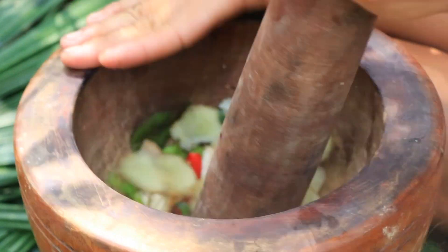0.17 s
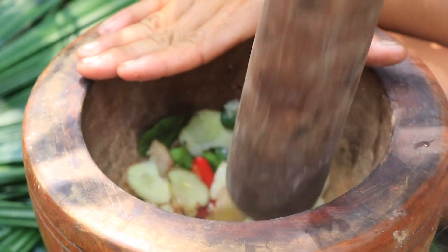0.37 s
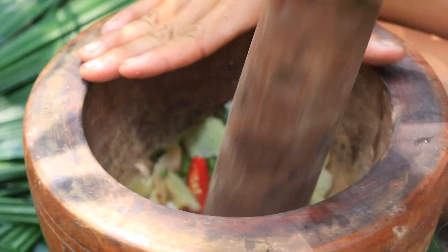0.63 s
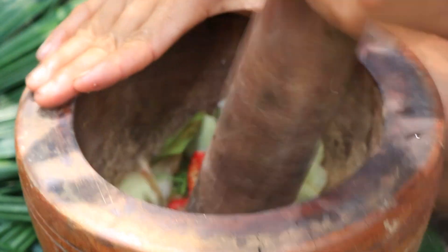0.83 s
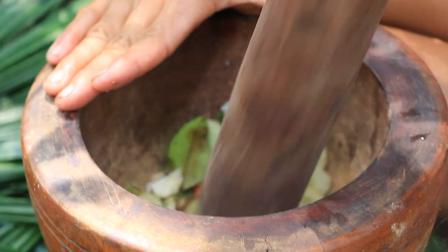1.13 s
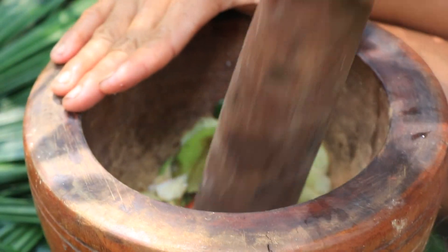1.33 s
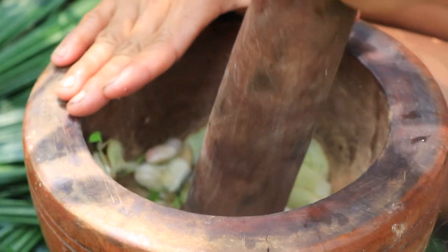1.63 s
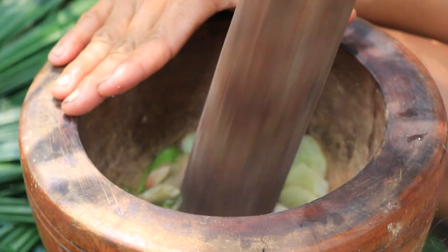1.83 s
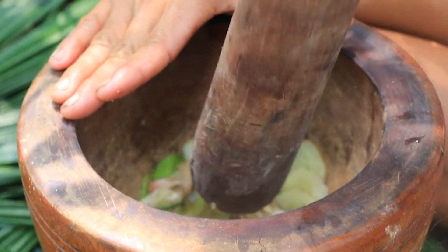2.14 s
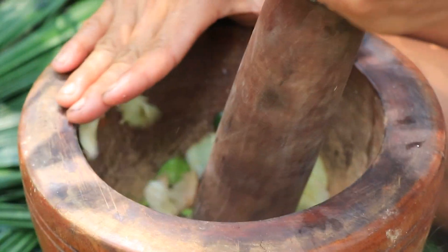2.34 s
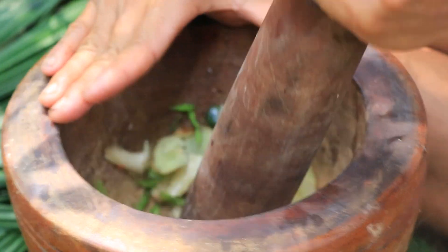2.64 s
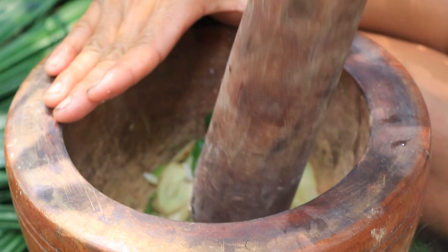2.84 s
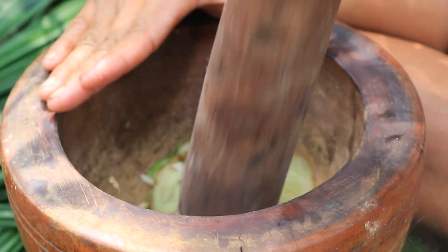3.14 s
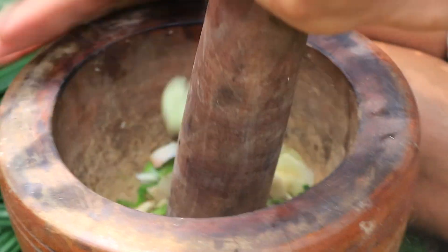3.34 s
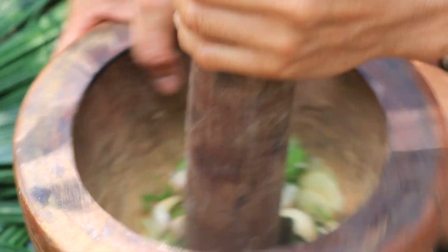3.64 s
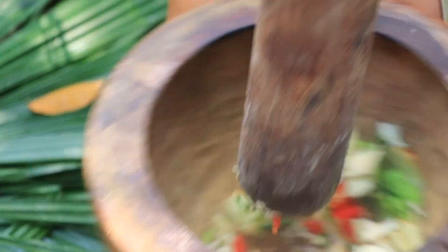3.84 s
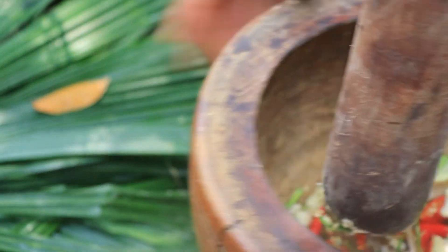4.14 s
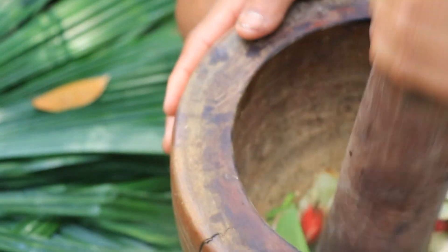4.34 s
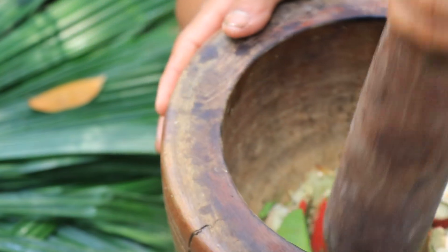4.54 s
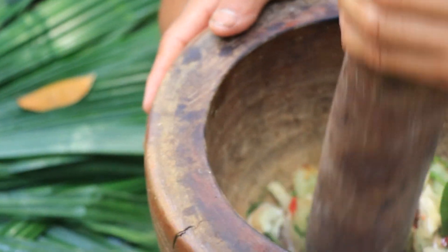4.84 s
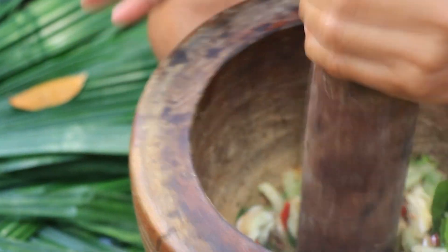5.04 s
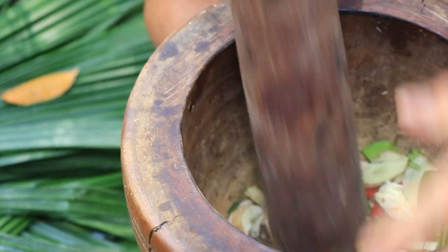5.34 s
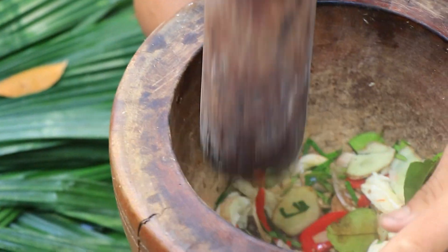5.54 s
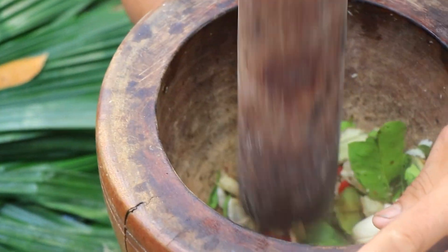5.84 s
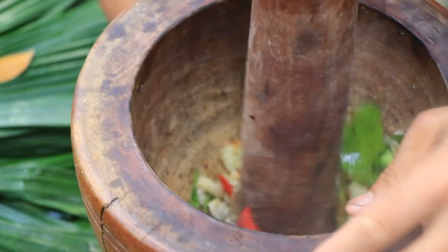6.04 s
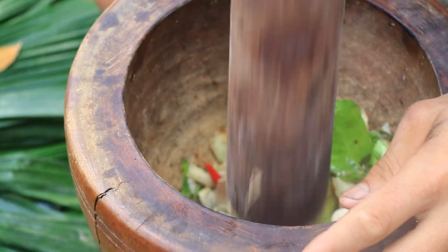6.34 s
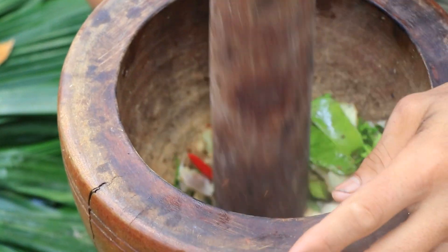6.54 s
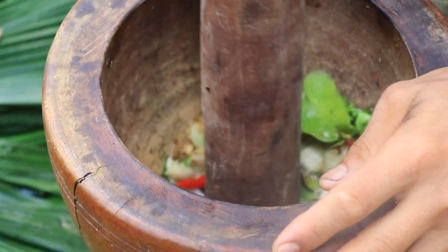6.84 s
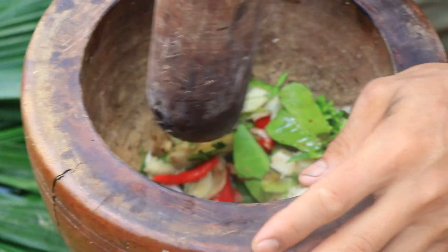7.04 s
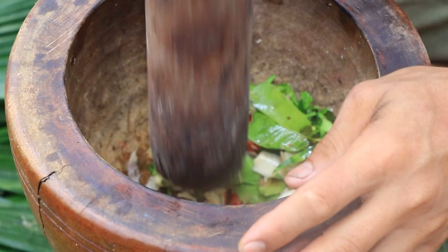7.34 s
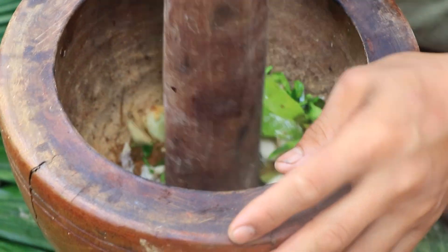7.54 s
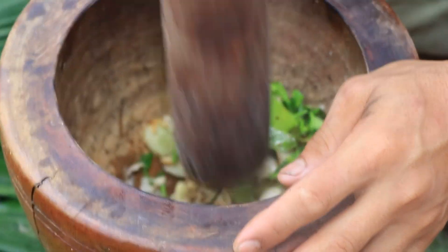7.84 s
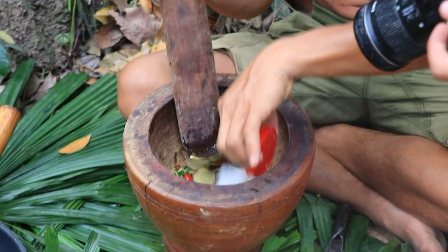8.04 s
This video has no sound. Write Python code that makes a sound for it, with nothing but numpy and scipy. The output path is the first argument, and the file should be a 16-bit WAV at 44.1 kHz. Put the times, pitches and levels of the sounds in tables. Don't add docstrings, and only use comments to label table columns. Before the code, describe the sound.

Outdoors among trees, a shrill insect chorus drones throughout, with a near cicada rasping about seven pulses a second. From 0.2 s a wooden pestle strikes herbs in a wooden mortar every 0.35 s: first crisp, wet crunches with dull thuds, and a brief leafy scrape at 0.95 s. From 1.25 s many blows reach bare wood, giving hard hollow knocks that die quickly. The cicada speeds up into a fast buzz by 3 s. After 3.35 s pounding pauses; the mortar slides faintly over leaves with tiny taps. Blows resume at 4.4, 4.75 and 5.1 s, while the cicada fades away. After another gap, crunches and strong knocks run from 5.7 to 8 s, loudest near 6.85 and 7.6 s, with slight clipping and background ducking. At 8.04 s an abrupt cut brings brief, slower cicada rasps.

```python
import sys
import numpy as np
from scipy import signal
from scipy.fft import rfft, irfft, next_fast_len
from scipy.io import wavfile
from scipy.ndimage import uniform_filter1d, minimum_filter1d, map_coordinates

SR = 44100
rng = np.random.default_rng(int(sys.argv[2]) if len(sys.argv) > 2 else 0)


def int16_out(signal):
    q = np.round(np.clip(np.atleast_2d(signal).T, -1, 1) * 32767)
    wavfile.write(sys.argv[1], SR, q.astype(np.int16))


def boost_factor(decibels):
    exponent = np.asarray(decibels, float) / 20
    return 10 ** exponent


N = 361619
CUT_S = 8.0422

# f/Hz, level/dB, t60/s
BELLY = [(486.3, 10, 0.042), (606, -15, 0.12), (370, -4.5, 0.061), (642, -19, 0.13)]
# f/Hz, level/dB, t60/s
WALL = [(948, -6.5, 0.057), (1114, 3, 0.048), (1310, 7.5, 0.0083), (1615, 3, 0.031), (1840, 1, 0.023),
        (2070, -42, 0.023), (3130, -12, 0.016)]


def unit(x):
    return x / np.sqrt(np.mean(x ** 2) + 1e-20)


def along(points, hz):
    f, v = np.transpose(points)
    return np.interp(np.log(hz + 1), np.log(f + 1), v)


def wobble(rate):
    knots = rng.standard_normal(int(N * rate / SR) + 4)
    return map_coordinates(knots, [np.arange(N) * rate / SR])


def filtered(x, response):
    m = next_fast_len(N + 8192)
    return irfft(rfft(x, m) * response(np.fft.rfftfreq(m, 1 / SR)), m)[..., :N]


def add(track, s, sound):
    start = max(round(s * SR), 0)
    track[..., start:start + sound.shape[-1]] += sound


def knocks():
    # t/s, belly level/dB, wall level/dB, ground thud level/dB, brightness/(dB per octave)
    bare = [(1.2498, 4.5, 9.5, -8.5, 8.5), (1.9417, -5, 0.5, -5.5, 3), (2.2928, 3, 10, -7.5, 5),
            (3.0001, -2, 5.5, -9.5, 3), (3.3421, -1, -6, -8.5, -3), (4.7549, 2, 7, -13, -8.5),
            (5.097, -10.5, -15, -8.5, -5), (6.0984, 2, 11.5, -18, -11), (6.8404, 7.5, 16, -6, 6),
            (7.2113, -2.5, 3.5, -14, -10), (7.603, 9, 16.5, -7, -2)]
    # upper belly/dB, lower belly/dB, pestle/dB, upper wall/dB, wall f/Hz
    spots = [(-1, -7, 8, 0, 1097), (2, 7, 10, -10, 1080), (5, -1, 5, 2, 1125), (10, 8, 1, 3, 1150),
             (9.5, 6, 17, -10, 1080), (0, 4, -1, -3, 1125), (-2, 3, 1, 1, 1200), (11.5, -14, 4, 0, 1213),
             (8, 4.5, 5.5, 0.5, 1202), (8.5, 6, 12, 10.5, 1130), (-5, 2, 4, 2.5, 1110)]
    # slap level re belly/dB, thud f/Hz, low rim/dB, high rim/dB
    contacts = [(-24, 360, 3, 3.5), (-40, 305, 5, 6), (-30, 356, 2.5, 3.5), (-40, 380, 0, -7),
                (-26, 365, -5, -3), (-20, 310, -12, 1), (-30, 304, -2, 2), (-14, 360, -1, 1.5),
                (-22, 285, -5.5, -0.5), (-22, 430, -2, -6), (-21, 380, 3.5, 3)]
    # belly f/Hz, pestle f/Hz, wall t60/s, low boom level/dB
    grips = [(495, 840, 0.043, -8), (478, 1000, 0.051, -25), (483, 920, 0.054, -36), (485, 940, 0.061, -29),
             (502, 930, .05, -23), (500, 955, 0.03, -20), (495, 955, 0.046, -27), (525, 940, 0.041, -6),
             (516, 940, 0.043, -5), (508, 960, 0.042, -15), (511, 860, .05, 0)]
    # t/s, belly level/dB, wall level/dB, thud level/dB, thud f/Hz
    cushioned = [(0.2036, -22.5, -20, -17.5, 337), (0.205, -40, -36, -17.5, 170),
                 (0.5515, -27, -15, -15, 187), (0.903, -22, -13, -20.5, 124), (0.9057, -34, -38, -19, 260),
                 (1.592, -16.5, -28, -13, 154), (1.594, -51, -40, -18, 354),
                 (2.659, -20.5, -29, -13.5, 194), (3.347, -20, 3.5, -32, 357), (4.407, -15, -18, -15, 328),
                 (4.431, -45, -34, -22, 251), (4.453, -25, -49, -21, 336), (4.7639, -8, -16, 0, 344),
                 (5.1071, -11.5, -10, -27, 375), (5.7025, -32.5, -21, -31, 207),
                 (5.7238, -25.5, -20, -16, 367), (6.0087, -52, -33, -31, 234), (6.1103, 5.5, -12, 4, 370),
                 (6.4771, -12, -9, -8, 330), (6.499, -21, -29, -11.5, 318), (7.9706, -20, -15, -17, 270)]
    belly_swing = [
        [1],
        [-1],
        [1],
        [1],
    ]
    far_side_s = (1.942, 5.097)
    # f/Hz, level/dB
    echo = [(60, -30), (150, 3), (500, 14), (1200, 10), (2500, -6), (6000, -48)]
    sing_db, sing_growth = -35, 0.6
    loose_db, regrip_s = 12, 5.9

    track, wash, t = np.zeros((2, N + SR)), np.zeros(N + SR), np.arange(SR // 3) / SR
    blows = [(*row, BELLY, WALL, -120, -120) for row in cushioned]
    for (*row, tilt), spot, (slap, thud_hz, *rim), (*grip, boom) in zip(bare, spots, contacts, grips):
        blows.append((*row, thud_hz, *struck(tilt, *spot, *rim, *grip), row[1] + slap, boom))
    blows = sorted(blows)
    luck = rng.standard_normal((len(blows), 2, 3, len(WALL), 1))
    for row, (belly_luck, wall_luck) in zip(blows, luck):
        s, belly_db, wall_db, thud_db, thud_hz, belly, wall, slap_db, boom_db = row
        blow = boost_factor(belly_db + 11.5) * ring(belly, belly_luck, t, belly_swing)
        blow -= boost_factor(wall_db + 11.5) * ring(wall, wall_luck, t)
        blow += boost_factor(thud_db + 16.0 - 60 * t / 0.018) * np.sin(2 * np.pi * thud_hz * t)
        blow += boost_factor(slap_db - 18.0 - 60 * t / 0.017) * np.sin(2 * np.pi * 770 * t)
        blow -= boost_factor(boom_db - 60 * t / 0.03) * np.sin(2 * np.pi * 65 * t)
        note_db = min(sing_db + sing_growth * belly_db + loose_db * (s > regrip_s), belly_db - 20)
        beating = np.sin(2 * np.pi * 957 * t) * np.cos(2 * np.pi * 3 * t)
        blow += boost_factor(note_db - 60 * t / 0.4) * beating
        pulls = belly is BELLY or np.abs(s - np.array(far_side_s)).min() < 0.004
        push = -1 if pulls else 1
        add(track, s - 0.0007, push * blow * (1 - np.exp(-t / 0.0017)))
        add(wash, s, boost_factor(belly_db - 35.0 - 60 * t / 0.54) * (1 - np.exp(-t / 0.0069)))
    noise = rng.standard_normal((2, N))
    shared, own = unit(filtered(noise, lambda hz: boost_factor(along(echo, hz))))
    return track[:, :N] + wash[:N] * np.array([shared + 0.63 * own, shared - 0.27 * own])


def struck(tilt_db, upper_db, lower_db, pestle_db, rim_db, wall_hz, low_rim_db, high_rim_db,
           belly_hz, pestle_hz, wall_t60):
    pivot_hz = 1200
    belly = [[hz, db + more, t60] for (hz, db, t60), more in zip(BELLY, (0, upper_db, lower_db, 0))]
    more_db = (pestle_db, 0, rim_db, low_rim_db, high_rim_db, 0, 0)
    wall = [[hz, db + more + tilt_db * np.log2(hz / pivot_hz), t60]
            for (hz, db, t60), more in zip(WALL, more_db)]
    belly[0][0], wall[0][0] = belly_hz, pestle_hz
    wall[1][0], wall[1][2] = wall_hz, wall_t60
    return belly, wall


def ring(modes, luck, t, swing=1):
    hz, db, t60 = np.transpose(modes)[..., None]
    strength, tune, ear = luck[:, :len(modes)]
    decay = boost_factor(db + 0.6 * strength - 60 * t / t60)
    each = swing * decay * np.sin(2 * np.pi * hz * (1 + 0.006 * tune) * t)
    left = (boost_factor(1.1 * ear) * each).sum(axis=0)
    right = (boost_factor(-0.9 * ear) * each).sum(axis=0)
    pair = np.array([left, right])
    return pair / np.abs(pair).max()


def crunch(count=150):
    # t/s, peak level/dB, snap f/Hz, length/ms, juice spray level/dB
    crushed = [(0.208, 3.5, 2650, 3.3, -15), (0.548, -1, 3080, 2.9, -7.5), (0.9012, 5, 3200, 2.5, -5.5),
               (1.248, -6.5, 2760, 3.6, -6.5), (1.5898, -4.5, 3080, 2.6, -13),
               (1.9398, -2, 2750, 3.6, -5.5), (2.2919, -2, 1960, 4.3, -2), (2.652, -3.5, 2000, 4.2, -6),
               (2.999, -1, 3130, 1.6, -3.5), (3.339, -4.5, 3850, 3.7, -10.5),
               (4.3966, -5.5, 2330, 1.57, -28), (4.755, -16, 1920, 5.1, -10.5),
               (5.0958, -11, 3400, 2.5, -16), (5.7258, 0, 3700, 4, -6), (6.096, -17, 2130, 6.9, -17.5),
               (6.4768, 3, 2740, 2.26, -4), (6.8425, -1, 1950, 1.9, -2), (7.2102, -20, 2880, 2.9, -9.5),
               (7.6022, -7, 2800, 1.26, 0.5), (7.9795, 0.5, 2680, 3.7, -10)]
    # t/s, peak level/dB, snap f/Hz, length/ms
    settling = [(0.2037, -2.5, 2660, 3.75), (0.534, -26, 1510, 5.5), (0.562, -5, 2720, 3.2),
                (0.889, -28, 1520, 3.9), (1.585, -24, 3000, 2.5), (1.925, -25, 3470, 11),
                (2.659, -7, 1980, 5.9), (3.685, -20, 3470, 4.9), (4.407, -7.5, 2480, 7.3),
                (4.419, -13, 2400, 13), (1.592, -4, 2850, 4.1), (4.735, -23, 3680, 5.6),
                (5.082, -28, 1720, 9.4), (5.108, -1.5, 3300, 3), (4.764, 1, 2200, 2.3),
                (5.704, -11, 3450, 8), (5.715, -13, 2880, 10), (6.083, -44, 1300, 6.7),
                (6.497, 5.5, 3500, 5.8), (6.828, -56, 1300, 6.2), (7.228, -1.5, 2680, 10.3),
                (7.497, -23, 1340, 7.3), (7.96, -16, 2190, 8.5), (7.974, -11, 2700, 6),
                (7.9705, -6, 2540, 4.6)]
    # f/Hz, level/dB
    spray_tone = [(2500, -26), (4500, 7.5), (8000, 9.5), (12000, 0), (16000, -6)]
    damp_db = -8
    rise, fade = 0.96, 0.93

    track, t = np.zeros((2, N + SR)), np.arange(200) / SR
    spray, lag_ms = np.zeros(N + SR), np.arange(-2000, 2000) / SR * 1000
    crushes = crushed + [(*row, row[1] + damp_db) for row in settling]
    luck = rng.random((len(crushes), 5, count))
    for (s, db, pitch_hz, length_ms, spray_db), (when, side, tone, size, pan) in zip(crushes, luck):
        rise_ms, fade_ms = rise * length_ms, fade * length_ms
        wait = -np.log(1 - when)
        before = side < rise_ms / (rise_ms + fade_ms)
        offset = wait * np.where(before, -0.9 * rise_ms, 0.64 * fade_ms) / 1000
        hz = np.clip(pitch_hz * 1.83 ** (2 * tone - 0.95) ** 3, 1200, 14000)[:, None]
        snaps = np.sin(2 * np.pi * hz * t) * hz * t * np.exp(-hz * t / 0.61)
        gain = boost_factor(-2.2 * np.log(1 - size) - 1.3 * wait)
        burst = np.zeros((2, SR // 5))
        for at, g, snap, p in zip(offset, gain, snaps, pan):
            add(burst, 0.1 + at, g * snap * boost_factor([[6 * p - 4.5], [4.5 - 6 * p]]))
        add(track, s - 0.1, boost_factor(db - 3.0) * burst / np.abs(burst.mean(axis=0)).max())
        spread_ms = np.where(lag_ms < 0, 0.59 * rise_ms, 0.89 * fade_ms)
        add(spray, s - 2000 / SR, boost_factor(spray_db - 4.5) * np.exp(-np.abs(lag_ms) / spread_ms))
    hiss = unit(filtered(rng.standard_normal((2, N)), lambda hz: boost_factor(along(spray_tone, hz))))
    return track[:, :N] + spray[:N] * hiss * boost_factor([[-1.5], [1.5]])


def stems():
    # t/s, peak level/dB, f/Hz
    breaks = [(.2012, -18, 2740), (.2035, -7, 2480), (.2048, -18, 2700), (.2076, -4, 2800),
              (.2114, -18, 2700), (.5474, -7.5, 3350), (0.5505, -6, 2930), (0.553, -11, 3000),
              (.564, -10, 2700), (.5655, -11, 2700), (0.8975, -15, 3080), (0.902, -3, 3130),
              (.9022, -5, 2760), (0.9037, -9, 2960), (1.2459, -2, 3370), (1.2483, -5, 2920),
              (1.5859, -18, 2800), (1.5887, -14, 3280), (1.5913, -10, 3000), (1.5917, -6, 2990),
              (1.94, -2, 3520), (1.9395, 0.5, 3030), (1.9407, -10.5, 2840), (2.287, -7, 2970),
              (2.2926, -9, 1900), (2.293, 1, 1900), (2.6503, -4.5, 2630), (2.6527, 0, 1850),
              (2.6531, -2.5, 1860), (2.9989, -3, 1920), (3.336, -9, 3300), (3.3398, -9.5, 3160),
              (4.3964, -3, 2350), (4.4073, -6, 2200), (5.0955, -14, 3400), (5.097, -25, 3000),
              (5.1095, -16, 3300), (5.699, -13, 3400), (5.7035, -15, 3480), (5.7211, -11.5, 1800),
              (5.7247, -12, 2100), (5.7279, -4, 4130), (6.4743, -4, 3400), (6.4758, -7, 3000),
              (6.477, -18, 2760), (6.4965, -13, 3670), (6.499, -12, 3920), (7.211, -7, 2830),
              (7.604, 7, 1660), (7.969, -4, 2500), (7.9705, -3, 2500), (7.972, -8, 2470),
              (7.9751, -12, 2750), (7.98, -1, 2400), (7.981, -5, 4000)]
    peak_cycles, gain_db = 1.104, 0.5

    track, t = np.zeros((2, N + SR)), np.arange(400) / SR
    for (s, db, hz), (phase, pan) in zip(breaks, rng.random((len(breaks), 2))):
        u = hz * t / peak_cycles
        swell = u ** 2 * np.exp(2 - 2 * u)
        snap = boost_factor(db + gain_db) * swell * np.sin(2 * np.pi * (hz * t + phase))
        add(track, s - peak_cycles / hz, snap * boost_factor([[3 * pan - 3], [3 - 3 * pan]]))
    return track[:, :N]


def drag():
    # t/s, level/dB
    drags = [
        [(0.92, -61), (0.936, -31), (0.958, -16.5), (0.988, -28.5), (1.04, -39)],
        [(3.6, -49), (3.7, -34), (3.73, -27.5), (3.748, -37.5), (3.836, -34.5), (3.906, -33.5), (4.064, -39),
         (4.1, -49)],
        [(3.09, -60), (3.13, -43), (3.23, -37), (3.26, -60)],
        [(5.44, -60), (5.49, -43), (5.6, -47), (5.68, -57)],
    ]
    # level re scrape/dB, delay/s, scrape dull above f/Hz
    bumping = [
        (-13.5, 0.0052, 870),
        (-15.5, 0.025, 13000),
        (-20, .01, 2000),
        (-11, .01, 1600),
    ]
    # f/Hz, level/dB
    scrape_tone = [(200, -16), (400, -7.5), (600, -5.5), (1200, -7), (2500, -4.5), (6000, -40)]
    # f/Hz, level/dB
    bump_tone = [(50, -30), (120, 3), (180, -1), (300, 0), (600, -16)]

    t = np.arange(N) / SR

    def level(rows, late):
        return boost_factor(np.interp(t - late, *np.transpose(rows), left=-120, right=-120))

    grains = rng.standard_normal((3, N)) * boost_factor(1.4 * wobble(rate=330))
    shared, own = unit(filtered(grains[:2], lambda hz: boost_factor(along(scrape_tone, hz))))
    scrape = np.array([shared + 0.28 * own, 1.16 * shared - 0.2 * own])
    bumps = unit(filtered(grains[2], lambda hz: boost_factor(along(bump_tone, hz))))
    track = np.zeros((2, N))
    for rows, (db, late, top_hz) in zip(drags, bumping):
        track += level(rows, 0) * filtered(scrape, lambda hz: 1 / (1 + (hz / top_hz) ** 2))
        track += boost_factor(db) * level(rows, late) * bumps
    return track


def taps():
    # t/s, peak level/dB, f/Hz, t60/s
    touches = [(3.159, -33, 1040, .04), (3.235, -23, 572, 0.05), (3.786, -23, 520, 0.032),
               (4.12, -18, 680, 0.048), (4.263, -29, 1310, 0.078), (4.278, -33, 606, 0.11),
               (5.2, -46, 1290, .06), (5.2, -40, 440, 0.045), (5.502, -33, 262, 0.037),
               (7.086, -19.5, 704, 0.0028), (7.141, -40, 1320, .03), (7.49, -44, 1180, 0.037),
               (7.505, -41, 890, 0.053), (7.852, -17.5, 1240, 0.0066), (7.86, -17, 1010, 0.0087)]
    # t/s, peak level/dB, f/Hz, t60/s
    stutter = [(0.955, -28, 300, .015), (0.959, -29, 260, .015), (0.9726, -17, 200, .02),
               (0.979, -16, 220, 0.027), (0.9845, -21, 190, 0.026)]

    track, t = np.zeros(N + SR), np.arange(SR // 5) / SR
    for s, db, hz, t60 in touches:
        tone = np.sin(2 * np.pi * hz * t) + 0.48 * np.sin(2 * np.pi * 1.84 * hz * t)
        rubbing = 1 + 0.58 * unit(uniform_filter1d(rng.standard_normal(len(t)), size=80))
        add(track, s, boost_factor(db - 60 * t / t60) * tone * rubbing * (1 - np.exp(-t / 0.00039)))
    for s, db, hz, t60 in stutter:
        add(track, s, -boost_factor(db - 60 * t / t60) * np.sin(2 * np.pi * hz * t) * np.exp(-t * hz * 0.3))
    return track[:N]


def cicada():
    # f/Hz, level/dB
    front_tone = [(5500, -55), (6500, -2), (8500, -4.5), (10500, -18), (13100, -10), (14200, -3),
                  (15000, -19), (15600, -5), (16500, -35)]
    # f/Hz, level/dB
    side_tone = [(4500, -40), (6500, -8), (9000, -17), (12800, -9), (13700, 0), (14500, -20), (15600, -12),
                 (16500, -35)]
    # f/Hz, level/dB
    note_tone = [(2200, -39), (2850, -2.5), (3200, 3.5), (3450, -5), (4200, -8.5), (6800, -18.5),
                 (7200, -7), (9100, -11), (9500, -31)]
    note_db = -26

    t = np.arange(N) / SR
    s, rate, db = rasps()
    swell = np.zeros(N + SR)
    for at, level, width in zip(s, db, 0.14 / rate):
        add(swell, at - 0.1, boost_factor(level) * np.exp(-0.5 * ((t[:SR // 5] - 0.1) / width) ** 2))
    beat = np.exp(0.25 * np.cos(2 * np.pi * (282 * t + 0.96 * wobble(rate=20))))
    direct, scattered = beat * rng.standard_normal((2, N))
    lag = 11
    ears = np.array([direct + 1.0 * scattered, np.roll(direct, lag) - 1.9 * scattered])
    front = unit(filtered(ears, lambda hz: boost_factor(along(front_tone, hz))))
    side = unit(filtered(ears, lambda hz: boost_factor(along(side_tone, hz))))
    buzz = np.where(t < CUT_S, front, side)
    hum = rng.standard_normal((2, N)) * boost_factor(0.67 * wobble(rate=480))
    note = boost_factor(note_db + insects()[1]) * unit(filtered(hum, lambda hz: boost_factor(along(note_tone, hz))))
    return (swell[:N] * buzz + note) * boost_factor([[-4], [0.4]])


def rasps():
    # t/s, rate/(rasps per s)
    tempo = [(0, 6.882), (1.5, 7.558), (2.3, 9.06), (2.9, 13.193), (3.7, 15.28), (5.05, 14.325)]
    first_rasp = 0.741
    last_rasps_s = (8.074, 8.195)
    rasp_db, hurry_db = -23.5, -0.22
    uneven_db = 0.8

    t = np.arange(round(tempo[-1][0] * SR)) / SR
    beats = np.cumsum(np.interp(t, *np.transpose(tempo))) / SR - first_rasp
    s = np.append(np.interp(np.arange(int(beats[-1]) + 1), beats, t), last_rasps_s)
    start_rate = tempo[0][1]
    rate = np.where(s < CUT_S, np.interp(s, *np.transpose(tempo)), start_rate)
    effort = insects()[1][(s * SR).astype(int)]
    scatter = uneven_db * rng.standard_normal(len(s))
    return s, rate, rasp_db + hurry_db * (rate - start_rate) + 0.77 * effort + scatter


def insects():
    # t/s, far chorus level/dB, near cicada level/dB
    course = [(0, -28, 0.5), (1, -28.5, 0), (2, -28, -0.5), (3, -28, -1), (4, -26, -3), (4.6, -26.5, -3.5),
              (5.2, -26.5, -14), (6, -27.5, -22), (7, -29, -17), (8.03, -27.5, -40), (8.045, -26, -4),
              (8.2, -27, -2)]
    s, *cols = np.transpose(course)
    return [np.interp(np.arange(N) / SR, s, c) for c in cols]


def background():
    # each f/Hz, level/dB
    low_tone = [(1000, -68), (1350, -33), (1540, -12.5), (1680, -8), (1800, -4.5), (1860, -3), (1930, -6),
                (2050, -9.5), (2600, -24.5), (3400, -53)]
    main_tone = [(1470, -39), (2500, -16.5), (2830, -17), (3310, -2.5), (3620, 1), (3800, -4),
                 (4130, -10.5), (4770, -18), (5000, -17.5), (6500, -24), (11000, -120)]
    upper_tone = [(2820, -48), (4800, -16), (5530, -4), (6210, -6.5), (7020, -3), (7660, -4.5), (8570, -6),
                  (9160, -11), (9600, -11.5), (12500, -17.5), (21100, -120)]
    top_tone = [(5410, -40), (9200, -7.5), (12700, 0.5), (15600, -9.5)]
    air_tone = [(15, -23), (25, 7.5), (103, -6.5), (147, -6), (179, -8), (287, -8.5), (450, -7.5),
                (700, -19), (1400, -8.5), (1820, -53), (3080, -120)]
    # f/Hz, width/Hz, level re drone/dB
    singers = [(1863, 60, 4.5), (3750, 27, 2), (3670, 31, 3.5), (5670, 18, 1.5), (7040, 70, 5),
               (8150, 48, 0), (8750, 90, -5), (8800, 43, 6), (9129, 30, -2), (9600, 36, 6.5),
               (12600, 50, -2), (13911, 25, 6), (14213, 36, 6), (14400, 25, 4)]

    strength, effort = insects()
    mean = strength.mean()

    def share(db, grows, near):
        return boost_factor(mean + db + grows * (strength - mean) + near * effort)

    drone = share(-8, 0.45, 0.031) * field(low_tone, clicky_db=-2.0, flutter_db=-0.5, voices_db=2.5)
    drone += share(0.082, 0.7, 0.011) * field(main_tone, clicky_db=0.5, flutter_db=0.0, voices_db=2.0)
    drone += share(-3.5, 1.26, 0.085) * field(upper_tone, clicky_db=-1.5, flutter_db=0.66, voices_db=2.5)
    drone += share(-9, 1, 0.28) * field(top_tone, clicky_db=0.5, flutter_db=-0.4, voices_db=2.7)
    drone = filtered(drone, lambda hz: boost_factor(sum(db / (1 + (2 * (hz - c) / w) ** 2) for c, w, db in singers)))
    murmur = field(air_tone, clicky_db=0.8, flutter_db=1.5, voices_db=2.0)
    return drone + share(-18, 0.55, -0.069) * murmur


def field(spectrum, clicky_db, flutter_db, voices_db):
    # f/Hz, correlation/1
    alike = [(60, 0.93), (150, 0.84), (380, 0.68), (950, 0.18), (2380, -0.019), (5980, -0.049),
             (15000, -0.14)]
    # f/Hz, level/dB
    sides = [(60, -0.5), (180, -0.5), (550, -1.5), (1650, -2), (4970, -2.5), (15000, -3.5)]

    unevenness = np.array([wobble(rate=640), wobble(rate=310)])
    clicks = rng.standard_normal((2, N)) * boost_factor(clicky_db * unevenness)
    z = signal.stft(clicks, nperseg=2048)[2]
    voices = uniform_filter1d(rng.standard_normal(z.shape), size=2, axis=1)
    voices = unit(uniform_filter1d(voices, size=6, axis=2))
    clicks = signal.istft(z * boost_factor(voices_db * voices), nperseg=2048)[1][:, :N]

    def turn(hz):
        return np.arccos(np.clip(along(alike, hz), -1, 1)) / 2

    mid, side = filtered(clicks, lambda hz: boost_factor(along(spectrum, hz)) * [np.cos(turn(hz)), np.sin(turn(hz))])
    pair = np.array([mid + side, mid - side])
    pair = filtered(pair, lambda hz: boost_factor(along(sides, hz) * [[0.5], [-0.5]]))
    return pair / np.std(pair.mean(axis=0)) * boost_factor(flutter_db * wobble(rate=56))


def duck(x):
    threshold_db, squeeze = -17, 0.94
    sense_s, hold_s, attack_s, release_db_per_s = 0.0071, 0.013, 0.0016, 149

    t = np.arange(N) / SR
    sense = int(sense_s * SR) // 2 * 2 + 1
    hold = int(hold_s * SR) // 2 * 2 + 1
    power = uniform_filter1d(np.mean(x ** 2, axis=0), sense, origin=sense // 2)
    level_db = 10 * np.log10(np.abs(power) + 1e-12)
    need = squeeze * np.clip(level_db - threshold_db, 0, None)
    held = -minimum_filter1d(-need, hold, origin=hold // 2)
    climb = release_db_per_s * t
    ramp = np.maximum.accumulate(held + climb) - climb
    keep = np.exp(-1 / (attack_s * SR))
    return signal.lfilter([1 - keep], [1, -keep], ramp)


def scene():
    wood = (knocks() + taps()) * boost_factor([[0.4], [-0.4]])
    return wood + crunch() + drag() + background() + cicada() + stems()


def band_limit(x):
    return signal.sosfilt(signal.butter(12, 15700, fs=SR, output="sos"), x)


def record(dry):
    band_hz = 15700
    t = np.arange(N) / SR
    splice = np.clip(np.abs(t - CUT_S) / 0.001 - 1, 0.05, 1)
    dry = signal.sosfilt(signal.butter(2, 60, "high", fs=SR, output="sos"), dry)
    x = dry * boost_factor(-duck(dry)) * splice
    x = x / (1 + np.abs(x) ** 12) ** (1 / 12)
    x = filtered(x, lambda hz: 1 / (1 + (hz / band_hz) ** 200))
    return band_limit(x)


dry = scene()
out = record(dry)
int16_out(out)
```